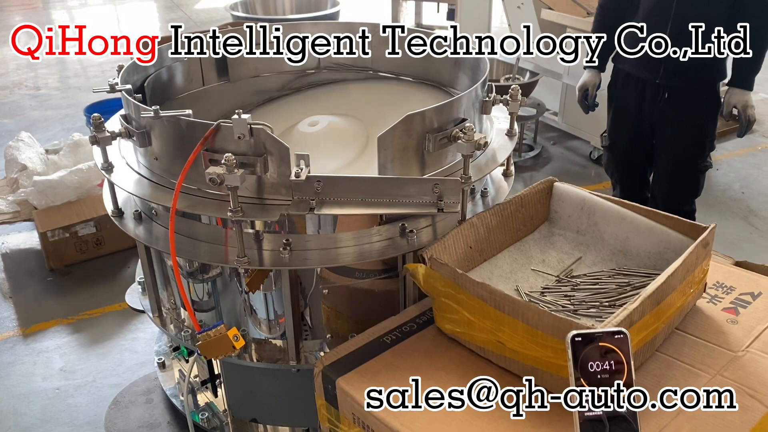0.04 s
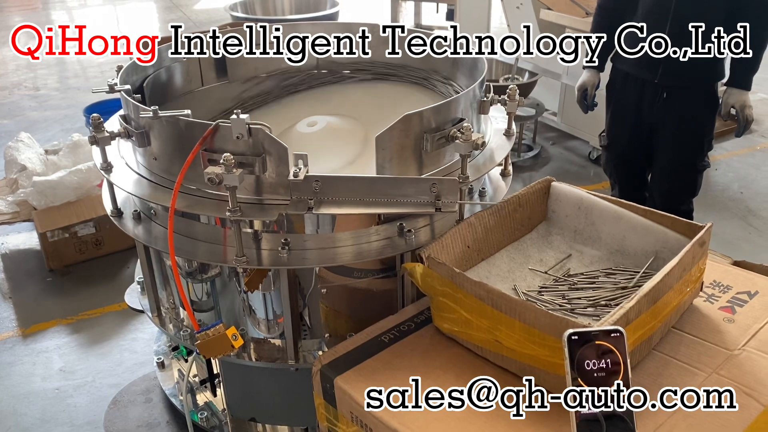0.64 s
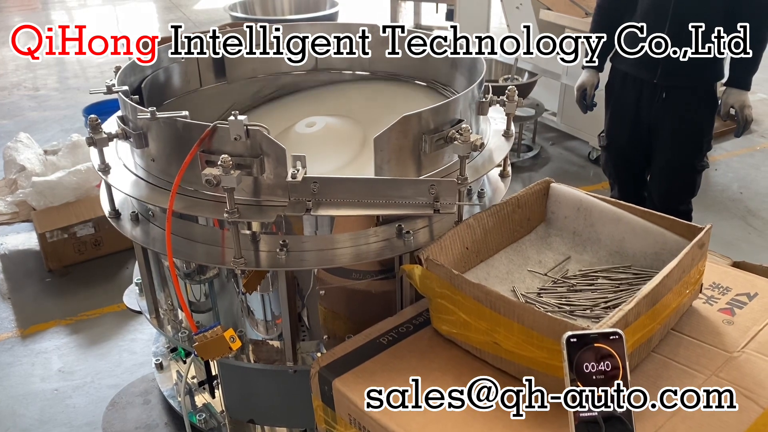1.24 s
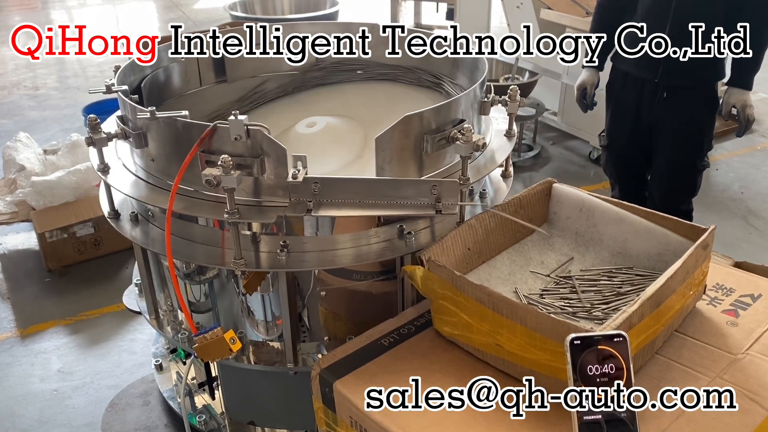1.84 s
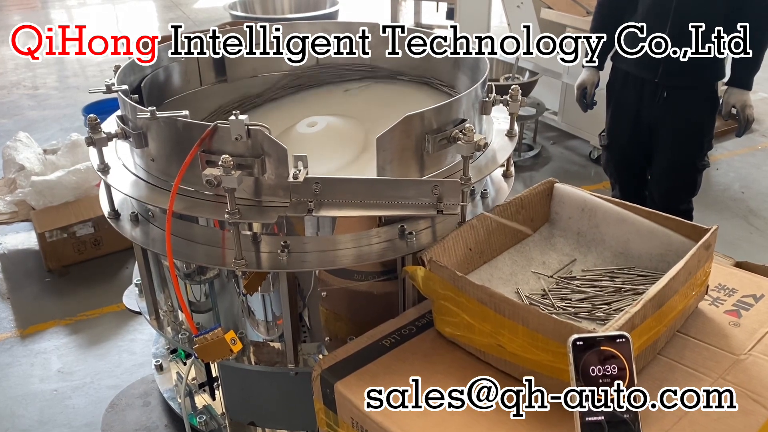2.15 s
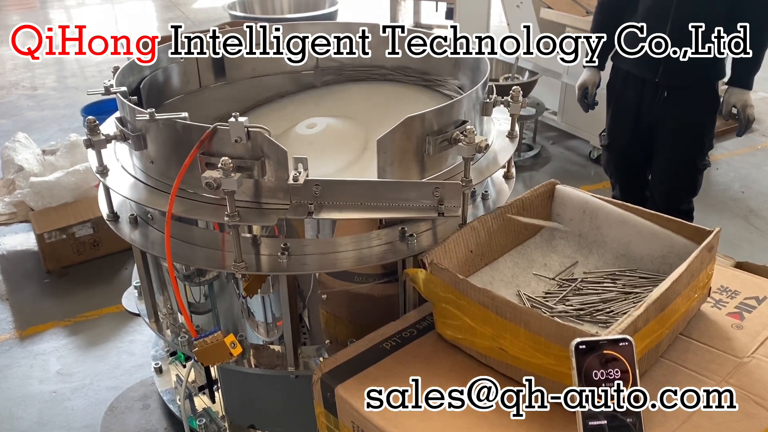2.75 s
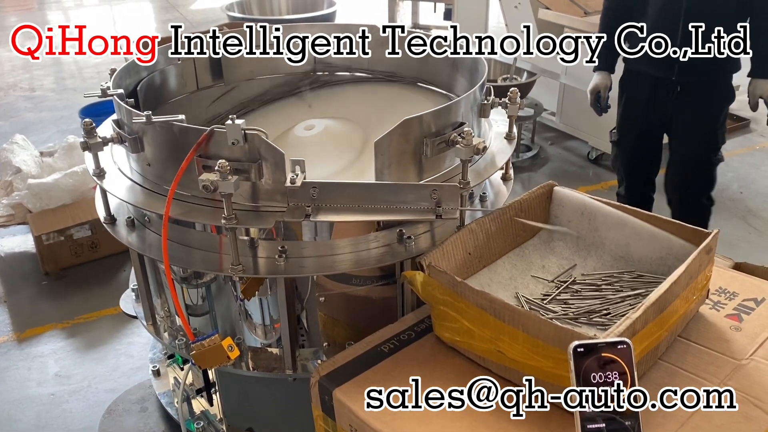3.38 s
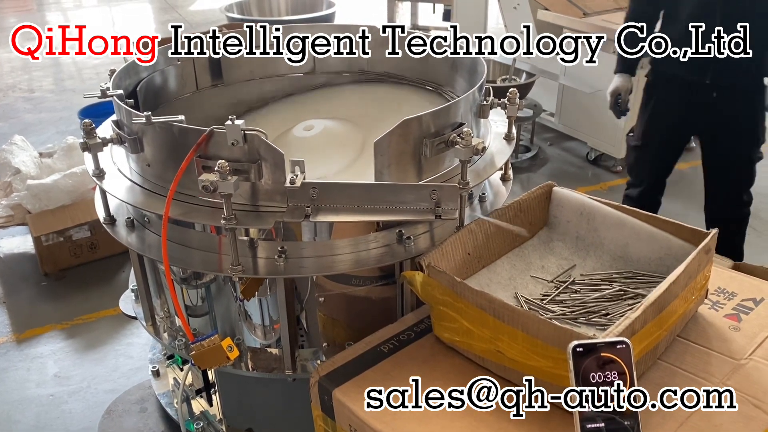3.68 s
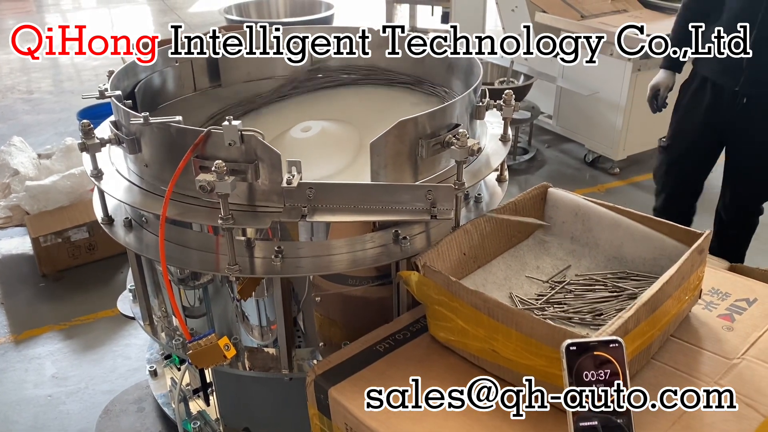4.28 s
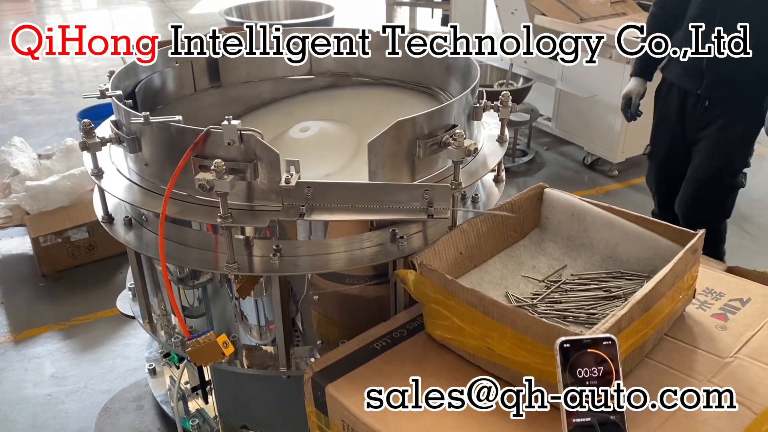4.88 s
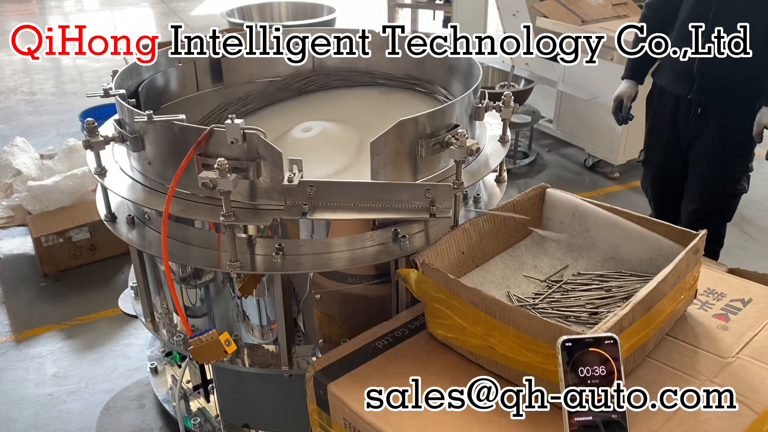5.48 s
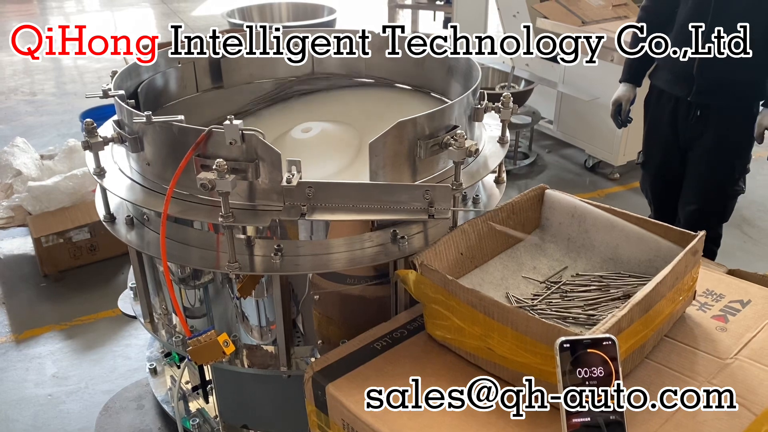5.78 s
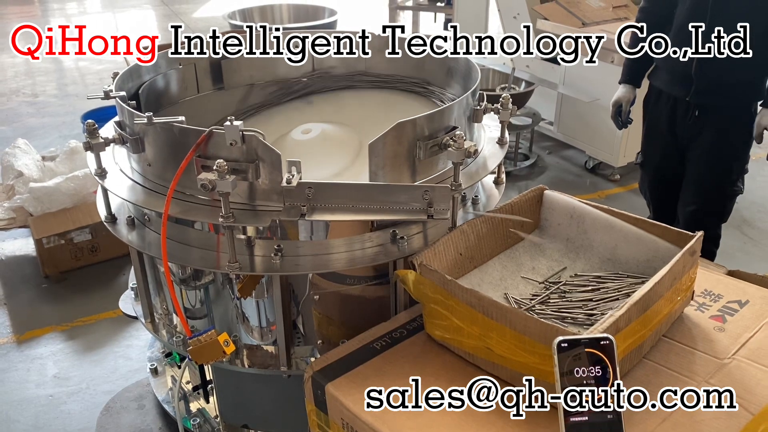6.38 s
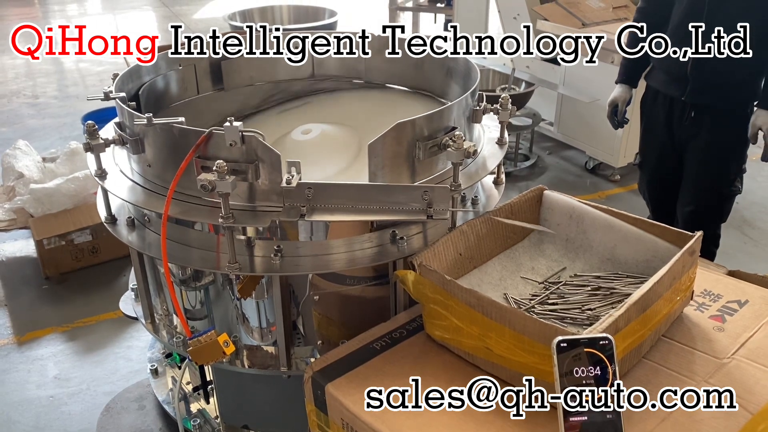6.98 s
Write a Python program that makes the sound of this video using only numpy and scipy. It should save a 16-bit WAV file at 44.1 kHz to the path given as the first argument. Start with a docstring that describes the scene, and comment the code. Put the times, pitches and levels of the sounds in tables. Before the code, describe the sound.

Heard from about a metre in a factory hall, a spinning bowl feeder keeps up a rapid, uneven chatter of small metal pins ringing against steel. A steady sliding hiss, the scuff and rumble of the disc and a thin, fluttering air whistle run underneath. Two soft thumps come after about a second, and sorted pins tap faintly onto cardboard throughout. The impacts have a short echo, and distant machines drone faintly.

```python
"""Small steel pins clink and rebound in a rotary bowl feeder, flung against the wall by its spinning disc.
Others slide along the rim, swelling once a turn as the heap comes round. The drive rumbles, the disc
scuffs, and an air nozzle gives a very high whistle. Sorted pins drop into a cardboard box and the frame
thumps twice. Impacts reverberate in a factory hall, over the drone of distant machines."""
import sys
import numpy as np
from scipy import signal
from scipy.fft import rfft, irfft, next_fast_len
from scipy.io import wavfile
from scipy.ndimage import map_coordinates

SR = 44100
rng = np.random.default_rng(int(sys.argv[2]) if len(sys.argv) > 2 else 0)


def wrap_up_sound(samples):
    """Save the sound to the file named by the first command line argument, as 16-bit audio."""
    columns = np.atleast_2d(samples).T
    # keep every value between -1 and 1, then stretch to whole-number steps
    tamed = np.clip(columns, -1, 1)
    steps = np.round(tamed * 32767).astype(np.int16)
    wavfile.write(sys.argv[1], SR, steps)


N = 310023
TIME_S = np.arange(N) / SR


def from_db(db):
    """Decibels to gain."""
    return 10 ** (np.asarray(db) / 20)


def unit_rms(x):
    """Scale to rms 1."""
    return x / np.sqrt(np.mean(x ** 2) + 1e-20)


def decay(t, t60_s):
    """Gain falling 60 dB in t60_s."""
    return np.exp(-np.log(1000) * t / t60_s)


def at_hz(table, hz):
    """Interpolate on a log-frequency axis."""
    known_hz, values = np.transpose(table)
    return np.interp(np.log(hz + 1), np.log(known_hz + 1), values)


def colour(x, spectrum, taps=1024):
    """Minimum-phase filter; white noise keeps its rms."""
    gain = unit_rms(from_db(at_hz(spectrum, np.fft.rfftfreq(taps, 1 / SR))))
    cepstrum = irfft(np.log(gain))
    cepstrum[1:taps // 2] *= 2
    cepstrum[taps // 2 + 1:] = 0
    impulse = irfft(np.exp(rfft(cepstrum)))
    return signal.oaconvolve(x, impulse[None], axes=1)[:, :N]


def resonate(x, hz, width_hz):
    """Two-pole resonance, peak gain 1."""
    r = np.exp(-np.pi * width_hz / SR)
    numerator = np.array([1, 0, -1]) * (1 - r * r) / 2
    denominator = [1, -2 * r * np.cos(2 * np.pi * hz / SR), r * r]
    return signal.lfilter(numerator, denominator, x + 1e-18)


def with_modes(x, modes, ring_db):
    """Input plus its modal ringing."""
    return x + sum(from_db(db + ring_db) * resonate(x, hz, width_hz) for hz, width_hz, db in modes)


def tick_power(per_s, spread_db, t60_s):
    """Power envelope of random decaying contacts, mean 1."""
    hits = (rng.random(N) < per_s / SR) * from_db(spread_db * (2 * rng.random(N) - 1))
    power = signal.lfilter([1], [1, -decay(1 / SR, t60_s) ** 2], hits ** 2 + 1e-18)
    return power / power.mean()


def waver(per_s):
    """Smooth random curve, rms 1."""
    return unit_rms(map_coordinates(rng.standard_normal(2048), [TIME_S * per_s], order=3, mode="wrap"))


def white_noise():
    """Independent mid and side noise."""
    return rng.standard_normal((2, N))


def mid_only(x):
    """Mono to mid/side, side silent."""
    return x[:N] * np.array([[1], [0]])


def heap(t, turn_s=1.262, arrival_s=0.53):
    """+1 as the heap of pins passes, -1 half a turn later."""
    return np.cos(2 * np.pi * (t - arrival_s) / turn_s)


# Pin and bowl modes, rubbed or struck: f/Hz, width/Hz, gain/dB
STEEL_MODES = [(2530, 40, -3), (2778, 34, 4), (3555, 42, 3), (3604, 28, 9), (3886, 45, -6), (4274, 36, 1),
               (4560, 60, -7), (4905, 45, -5), (5060, 40, 8), (5118, 36, 6), (5193, 32, 7), (5357, 45, -4),
               (5465, 36, 0), (5783, 22, 2), (5856, 22, 2), (5975, 36, 1), (6028, 45, 7), (6417, 36, 1),
               (6599, 36, 0), (6958, 48, 4), (7219, 42, 2), (7555, 50, -1), (7744, 40, 4), (8215, 60, -3),
               (9520, 50, 1), (9645, 45, -2), (9850, 45, -3), (10040, 50, -3), (10710, 50, -4),
               (11203, 50, 1)]
# Sliding spectrum: f/Hz, level/dB
SLIDE_SPECTRUM = [(700, -28), (1900, -18), (2350, 0), (3300, 1), (4200, 1), (5200, -1), (7200, -1.5),
                  (8300, 7), (8800, -2), (9700, 3.5), (11000, 1), (12600, -16), (14200, -27), (15700, -25)]


def sliding_pins(level_db=-30, swell_db=0.8, waver_db=0.5, grain_share=0.56):
    """Pins rub the rim: hiss and tiny ticks lightly ring the steel."""
    ticks = tick_power(per_s=230, spread_db=1.0, t60_s=0.068)
    friction = np.sqrt(1 - grain_share + grain_share * ticks) * white_noise()
    rub = with_modes(friction, STEEL_MODES, ring_db=-13.0)
    envelope_db = level_db + swell_db * heap(TIME_S) + waver_db * waver(per_s=3.7)
    return from_db(envelope_db) * unit_rms(colour(rub, SLIDE_SPECTRUM))


# Rumble envelope: t/s, level/dB
RUMBLE_LEVELS = [(0.0, -36), (0.25, -44.5), (0.29, -36.5), (0.53, -42), (0.6, -37.5), (0.76, -42),
                 (1.55, -42), (1.59, -38.5), (1.8, -43.5), (5.29, -43.5), (6.99, -42), (7.03, -38)]
# Rumble spectrum: f/Hz, level/dB
RUMBLE_SPECTRUM = [(40, -33), (90, -14.5), (125, -5), (170, 0), (230, -0.5), (310, -2), (400, -7.5),
                   (600, -17), (1000, -15), (2500, -50.5)]
# Frame and disc modes: f/Hz, width/Hz, gain/dB
FRAME_MODES = [(153.4, 4.2, 3.5), (196.8, 20.4, 7.5), (238, 7, -7), (298.6, 16, 2)]


def drive_rumble():
    """The turning disc rumbles through the frame."""
    frame = with_modes(white_noise(), FRAME_MODES, ring_db=-1.5)
    envelope_db = np.interp(TIME_S, *np.transpose(RUMBLE_LEVELS))
    return from_db(envelope_db) * unit_rms(colour(frame, RUMBLE_SPECTRUM, taps=8192))


# Scuff spectrum: f/Hz, level/dB
SCUFF_SPECTRUM = [(250, -18.5), (500, -2.5), (730, -3.5), (900, 2.5), (1250, -2), (1450, -1), (1750, -1),
                  (2100, 0.5), (3000, -19)]
# Low bowl-wall modes: f/Hz, width/Hz, gain/dB
WALL_MODES = [(915, 55, -11.5), (1166, 14, 2), (1289, 24, 8), (1635, 41, 6), (2220, 10.3, 11)]


def disc_scuff(level_db=-42.0):
    """The disc scuffs under the pins, exciting the bowl wall."""
    wall = with_modes(white_noise(), WALL_MODES, ring_db=3.5)
    return from_db(level_db) * unit_rms(colour(wall, SCUFF_SPECTRUM, taps=2048))


# Short hums: t/s, length/s, f/Hz, level/dB
HUMS = [(0.0, 0.43, 199, -42), (0.0, 0.26, 386, -48.5), (0.0, 0.21, 404, -54), (0.216, 0.33, 447, -51),
        (0.555, 0.5, 417, -58)]


def hums(waver_db=2):
    """Faint tones swell and fade beside the rumble."""
    out = np.zeros(N)
    for start_s, length_s, hz, db in HUMS:
        progress = np.clip((TIME_S - start_s) / length_s, 0, 1)
        swell = np.sqrt(np.abs(np.sin(np.pi * progress)))
        tone = np.sqrt(2) * np.sin(2 * np.pi * hz * TIME_S)
        out += from_db(db + waver_db * waver(per_s=13.1)) * swell * tone
    return mid_only(out)


def air_nozzle(hz=14875, width_hz=110, level_db=-44, flutter_db=2.0):
    """Turbulence feeds one very high, fluttering whistle."""
    jet = resonate(white_noise(), hz, width_hz)
    whistle = resonate(jet, hz, 2 * width_hz)
    flutter = from_db(flutter_db * waver(per_s=110))
    return from_db(level_db) * unit_rms(flutter * whistle)


# Hall drone spectrum: f/Hz, level/dB
DRONE_SPECTRUM = [(20, -20), (35, -5), (48, -1.5), (80, 1), (120, -3), (250, -16.5), (1000, -50)]


def hall_drone(level_db=-55.5):
    """Steady low noise of distant machines."""
    return from_db(level_db) * unit_rms(colour(white_noise(), DRONE_SPECTRUM, taps=8192))


# Loud pin strikes on the bowl: t/s, level/dB, chatter t60/s
STRIKES = [(0.043, -16, 0.078), (0.095, -19, 0.09), (0.147, -18.0, 0.075), (0.243, -18, 0.073),
           (0.278, -17, 0.29), (0.342, -21, 0.042), (0.398, -15, 0.3), (0.448, -19.5, 0.3),
           (0.525, -16, 0.081), (0.562, -17, 0.24), (0.632, -15.5, 0.14), (0.677, -15, 0.11),
           (0.72, -22, 0.19), (0.808, -14, 0.085), (0.88, -19, 0.19), (0.923, -22, 0.18),
           (0.946, -16, 0.07), (0.973, -22, 0.18), (0.997, -22, 0.21), (1.072, -16, 0.12),
           (1.147, -22.5, 0.09), (1.266, -18.0, 0.098), (1.342, -24.5, 0.17), (1.381, -19, 0.054),
           (1.437, -20, 0.19), (1.49, -20.5, 0.073), (1.528, -20, 0.1), (1.586, -13.5, 0.27),
           (1.693, -17, 0.17), (1.752, -20, 0.081), (1.794, -19, 0.18), (1.835, -18.5, 0.05),
           (1.862, -12.5, 0.27), (1.976, -18.5, 0.29), (2.017, -19.5, 0.18), (2.059, -17, 0.25),
           (2.107, -20.5, 0.24), (2.198, -16, 0.1), (2.304, -24.0, 0.059), (2.348, -21, 0.13),
           (2.566, -17.5, 0.18), (2.633, -17, 0.24), (2.708, -17, 0.18), (2.814, -22, 0.05),
           (2.871, -15.5, 0.26), (2.911, -17.5, 0.24), (3.032, -18.5, 0.47), (3.073, -17, 0.043),
           (3.104, -25, 0.29), (3.144, -16.5, 0.39), (3.198, -19.5, 0.19), (3.248, -13.5, 0.29),
           (3.299, -17, 0.22), (3.352, -19, 0.22), (3.426, -15, 0.23), (3.485, -20, 0.081),
           (3.566, -15.5, 0.077), (3.629, -30, 0.3), (3.757, -17, 0.081), (3.847, -18.5, 0.2),
           (3.913, -17.0, 0.11), (3.96, -18, 0.087), (3.986, -20.5, 0.15), (4.039, -15.5, 0.22),
           (4.12, -15.5, 0.084), (4.16, -21, 0.18), (4.195, -23, 0.19), (4.227, -19, 0.19),
           (4.341, -16, 0.24), (4.447, -16.5, 0.14), (4.496, -23.5, 0.093), (4.518, -15.0, 0.27),
           (4.718, -24, 0.087), (4.789, -20, 0.058), (4.85, -19.5, 0.12), (4.887, -19.5, 0.11),
           (4.924, -17, 0.09), (5.042, -31, 0.24), (5.065, -25, 0.067), (5.086, -17.5, 0.18),
           (5.124, -20.5, 0.24), (5.173, -18, 0.22), (5.206, -23.5, 0.23), (5.287, -20, 0.12),
           (5.376, -16.5, 0.22), (5.423, -21.5, 0.12), (5.436, -20, 0.058), (5.478, -14.5, 0.29),
           (5.518, -17.5, 0.083), (5.571, -13.5, 0.2), (5.631, -17.5, 0.29), (5.712, -17.5, 0.078),
           (5.822, -18.0, 0.06), (5.877, -17.0, 0.079), (6.059, -22, 0.07), (6.1, -14.5, 0.067),
           (6.173, -24, 0.22), (6.245, -19.5, 0.27), (6.3, -17.5, 0.12), (6.345, -21.5, 0.28),
           (6.451, -13.5, 0.27), (6.497, -20.0, 0.15), (6.556, -16, 0.23), (6.629, -19, 0.077),
           (6.683, -19.5, 0.28), (6.751, -17.5, 0.076), (6.774, -22.0, 0.19), (6.803, -21.5, 0.27),
           (6.819, -17, 0.36), (6.88, -17.5, 0.21)]


def rebounding_strikes(rebounds=3, flight_s=0.02, scatter=0.3, rebound_db=-0.5, max_t60_s=0.11):
    """Contacts (t/s, level/dB, t60/s): each pin lands, then rebounds until its chatter is 20 dB down."""
    flights_s = flight_s * (1 + scatter * rng.uniform(-1, 1, (len(STRIKES), rebounds)))
    contacts = []
    for (at_s, db, t60_s), delays_s in zip(STRIKES, np.cumsum(flights_s, axis=1)):
        contact_t60_s = min(t60_s, max_t60_s)
        contacts.append((at_s, db, contact_t60_s))
        for delay_s in delays_s[delays_s < t60_s / 3]:
            contacts.append((at_s + delay_s, db + rebound_db - 60 * delay_s / t60_s, contact_t60_s))
    return [row for row in contacts if row[0] < TIME_S[-1]]


def light_touches(count=45, level_db=-27.5, swell_db=2.0, spread_db=2.5, t60_s=0.12):
    """Contacts (t/s, level/dB, t60/s): pins graze the wall at random, harder as the heap passes."""
    times_s = rng.random(count) * N / SR
    levels_db = level_db + swell_db * heap(times_s) + spread_db * rng.standard_normal(count)
    return [(at_s, db, t60_s) for at_s, db in zip(times_s, levels_db)]


# Strike spectrum: f/Hz, level/dB
STRIKE_SPECTRUM = [(400, -35), (1300, -10.5), (2000, -14.5), (2450, -5.5), (3200, -6), (4200, -2),
                   (5400, -2), (7400, -1), (8300, 2.5), (8800, 6.5), (9700, 2.5), (11200, -4.5),
                   (12700, -13), (15700, -14.5)]


def pin_clinks(contacts, gain_db=-3.5, crack_db=-14.0, full_blow_db=-23.5, ring_db=2.0, spot_range_db=18):
    """Each contact cracks, then chatters; every spot on the wall excites the modes differently."""
    crack_power, chatter_power, treble_boost = np.zeros((3, N))
    latest_contact = np.zeros(N, int)
    treble_scatter_db = 2.5 * rng.standard_normal(len(contacts))
    for k, (at_s, db, t60_s) in enumerate(contacts):
        start = round(at_s * SR)
        t = np.arange(min(SR // 7, N - start)) / SR
        span = slice(start, start + len(t))
        blow = from_db(db) * (1 - decay(t, 0.0015))  # takes a moment to spread through the wall
        crack_power[span] += (blow * from_db(crack_db) * decay(t, 0.009)) ** 2
        chatter_power[span] += (blow * decay(t, t60_s)) ** 2
        # Weak, glancing contacts are shorter, hence brighter.
        treble_db = 0.5 * (full_blow_db - db) + treble_scatter_db[k]
        treble_boost[span] = from_db(treble_db) - 1
        latest_contact[start:] = k
    bounces = 0.5 + 0.5 * tick_power(per_s=620, spread_db=7.0, t60_s=0.015)
    force = np.sqrt(crack_power + chatter_power * bounces) * white_noise()
    highpass = signal.butter(1, 7500, "high", fs=SR, output="sos")
    force += treble_boost * signal.sosfilt(highpass, force)
    spot_gain = from_db(ring_db + spot_range_db * (rng.random((len(contacts), len(STEEL_MODES))) - 0.5))
    ringing = sum(from_db(db) * resonate(force * spot_gain[latest_contact, mode], hz, width_hz)
                  for mode, (hz, width_hz, db) in enumerate(STEEL_MODES))
    return from_db(gain_db) * colour(force + ringing, STRIKE_SPECTRUM)


def pin_tinks(contacts, gain_db=-14.0, partials=4, range_hz=(2400, 11400)):
    """Each contact rings a few clear partials, set by how the pin lies against the wall."""
    out, t = np.zeros(N + SR), np.arange(SR // 12) / SR
    pitches_hz = rng.uniform(*range_hz, (len(contacts), partials))
    envelope = (1 - decay(t, 0.003)) * decay(t, 0.08)
    for (at_s, db, _), hz in zip(contacts, pitches_hz):
        start = round(at_s * SR)
        tones = np.sin(2 * np.pi * hz[:, None] * t).sum(axis=0)
        out[start:start + len(t)] += from_db(db + gain_db) * tones * envelope
    return mid_only(out)


# Pins landing in the box: t/s, level/dB, hardness/(dB/octave)
DROPS = [(0.776, -45, 3), (1.457, -35, -2), (1.989, -35.5, 1), (2.087, -34.5, -4), (2.542, -38, 1),
         (3.016, -41, -3), (3.515, -38, -2), (3.713, -33, 2), (4.055, -36, -8), (4.466, -39, -3),
         (4.676, -37, -5), (5.551, -43, 5), (5.76, -35, -15), (6.023, -35, -8), (6.363, -37.5, -4)]
# Cardboard modes: f/Hz, gain/dB, t60/s
BOX_MODES = [(597.7, -5, 0.065), (663.3, -2, 0.073), (930.7, 6.5, 0.028)]


def box_drops():
    """Sorted pins knock dully on cardboard; harder landings favour the higher modes."""
    out, t = np.zeros(N + SR), np.arange(SR // 8) / SR
    hz, mode_db, t60_s = np.transpose(BOX_MODES)[:, :, None]
    ringing = np.sin(2 * np.pi * hz * t) * decay(t, t60_s)
    octaves = np.log2(hz / hz[0])
    for at_s, db, db_per_octave in DROPS:
        start = round(at_s * SR)
        gains = from_db(db + mode_db + db_per_octave * octaves)
        out[start:start + len(t)] += np.sum(gains * ringing, axis=0)
    return mid_only(out)


# Frame thumps: t/s, level/dB
THUMPS = [(1.106, -31.5), (1.281, -34)]


def frame_thumps(hz=201.3, length_s=0.032):
    """The frame gives soft thumps, each a few cycles of a low tone."""
    out = np.zeros(N)
    for at_s, db in THUMPS:
        t = TIME_S - at_s
        envelope = np.sin(np.pi * np.clip(t / length_s, 0, 1))
        out += from_db(db) * envelope * np.sin(2 * np.pi * hz * t)
    return mid_only(out)


def hall_reverb(x, gain_db=-22, t60_s=0.52, predelay_s=0.015, cutoff_hz=6000):
    """Diffuse, duller tail from the far walls."""
    t = np.arange(SR) / SR
    tail = rng.standard_normal((2, SR)) * decay(t, t60_s) * (t > predelay_s)
    lowpass = signal.butter(1, cutoff_hz, fs=SR, output="sos")
    tail = signal.sosfilt(lowpass, unit_rms(tail) / np.sqrt(SR))
    return from_db(gain_db) * signal.fftconvolve(x, tail, axes=1)[:, :N]


# Left-right coherence: f/Hz, coherence/1
PORT_COHERENCE = [(30, 0.43), (200, 1), (450, 0.75), (750, 0.2), (1200, 0.65), (1800, 0.61), (2500, 0.79),
                  (3300, 0.3), (5200, 0.85), (7500, 0.47), (8300, 0.98), (9800, 0.53), (10600, 0.9),
                  (15500, 0.7)]
# Left over right: f/Hz, level/dB
PORT_BALANCE = [(30, 3.5), (300, 0.5), (520, 3), (720, 9.5), (1200, 5.5), (1900, 6.5), (2450, 2),
                (3400, 8.5), (4500, 4.5), (5300, 5), (6500, 1.5), (7600, 7), (8100, 0), (16000, 0)]
# Left lead: f/Hz, phase/rad
PORT_PHASE = [(0, 0), (480, 0), (690, 1.0), (1000, .4), (1450, 1.0), (2100, 0), (2800, 1.3), (3600, .7),
              (5000, .8), (6200, -.4), (6800, 0), (7700, -1.5), (8000, -3.4), (8900, -3.6), (10300, -6.3),
              (11700, -6.3), (12500, -9.4), (14400, -9.4), (15200, -12.6)]


def microphone_ports(field):
    """Mid and side reach a left and a right port with shading and phase shift."""
    size = next_fast_len(N + SR // 10)
    hz = np.fft.rfftfreq(size, 1 / SR)
    mid, side = rfft(field, size)
    sign = np.array([[1], [-1]])
    coherence = at_hz(PORT_COHERENCE, hz)
    left_right = np.sqrt(1 + coherence) * mid + sign * np.sqrt(1 - coherence) * side
    shading = from_db(sign * at_hz(PORT_BALANCE, hz) / 2)
    shading /= np.sqrt(np.sum(shading ** 2, axis=0))
    phase_shift = np.exp(0.5j * sign * np.interp(hz, *np.transpose(PORT_PHASE)))
    return irfft(shading * phase_shift * left_right, size)[:, :N]


def scene():
    """The feeder at about a metre; only the impacts reverberate."""
    contacts = sorted(rebounding_strikes() + light_touches())
    impacts = pin_clinks(contacts) + pin_tinks(contacts) + box_drops() + frame_thumps()
    bed = sliding_pins() + drive_rumble() + disc_scuff() + hums() + air_nozzle() + hall_drone()
    return microphone_ports(impacts + hall_reverb(impacts) + bed)


def record(dry, cutoff_hz=15750):
    """Steep elliptic low-pass."""
    return signal.sosfilt(signal.ellip(12, 0.1, 80, cutoff_hz, fs=SR, output="sos"), dry)


dry = scene()
out = record(dry)
wrap_up_sound(out)
```